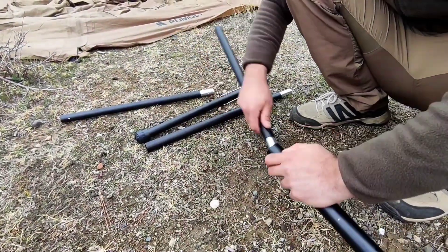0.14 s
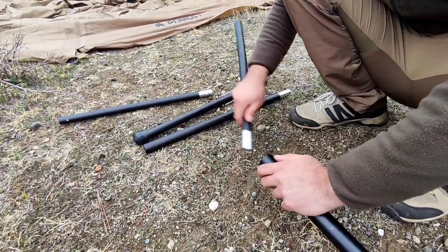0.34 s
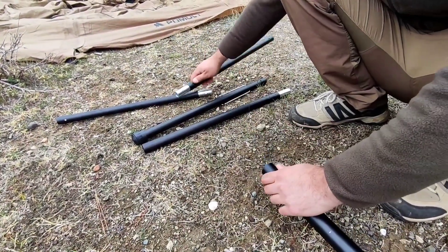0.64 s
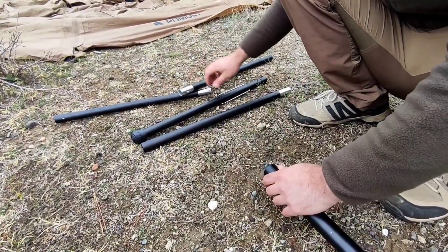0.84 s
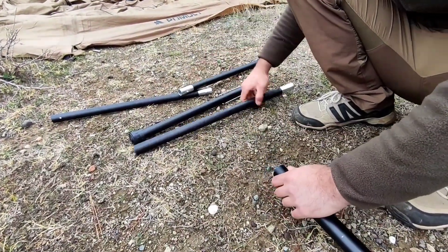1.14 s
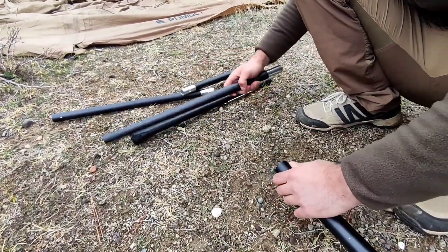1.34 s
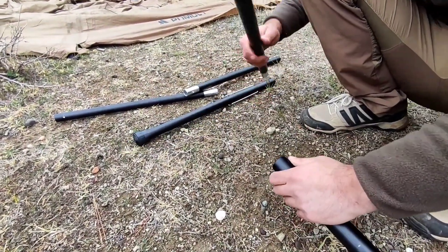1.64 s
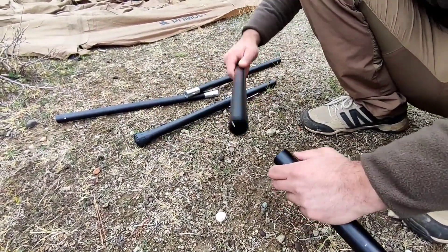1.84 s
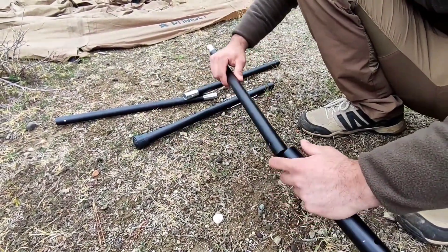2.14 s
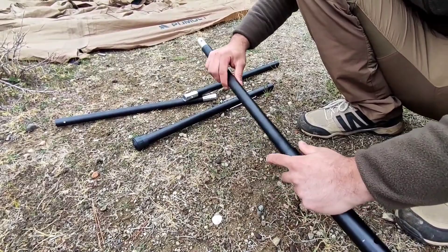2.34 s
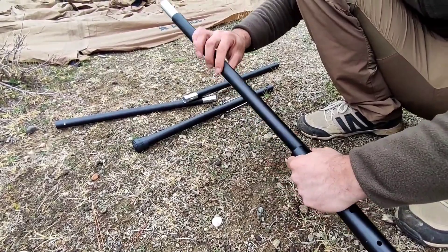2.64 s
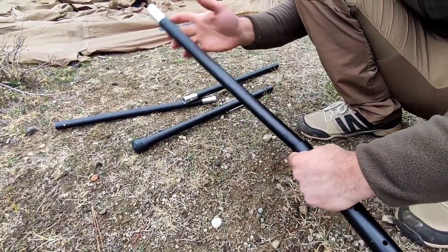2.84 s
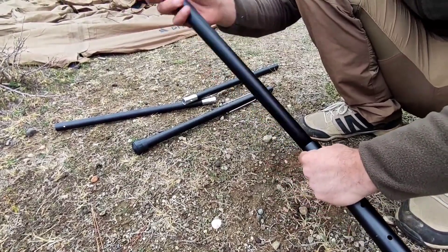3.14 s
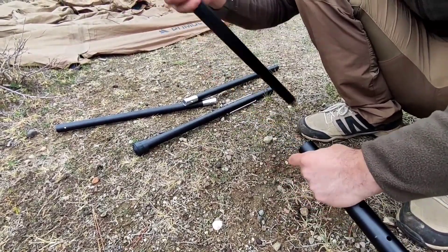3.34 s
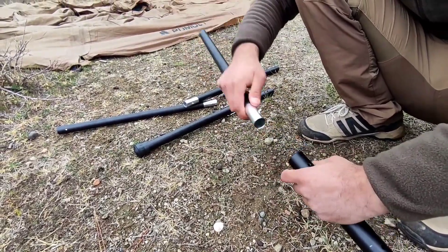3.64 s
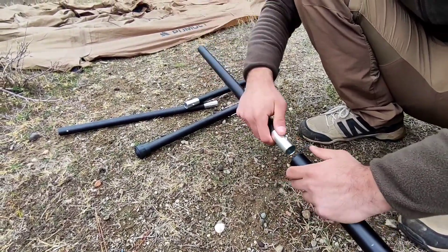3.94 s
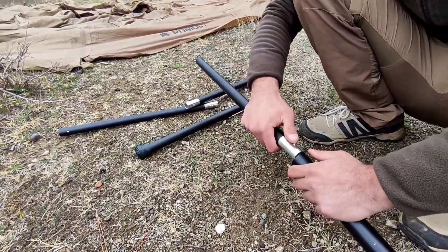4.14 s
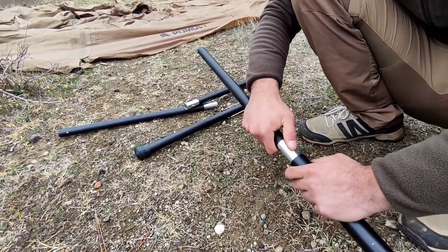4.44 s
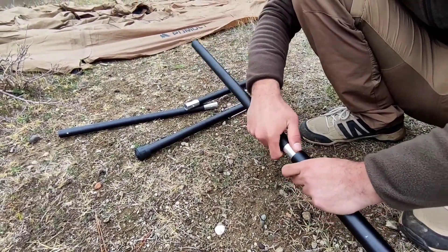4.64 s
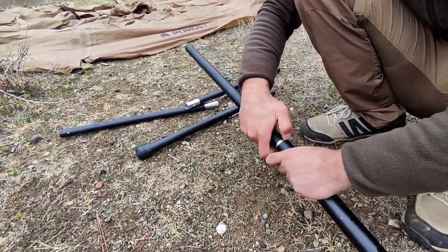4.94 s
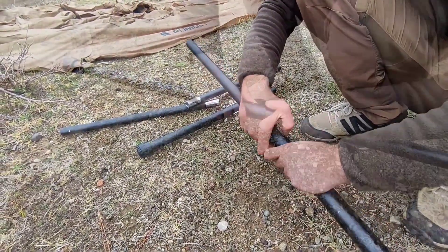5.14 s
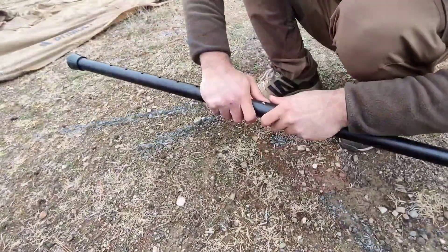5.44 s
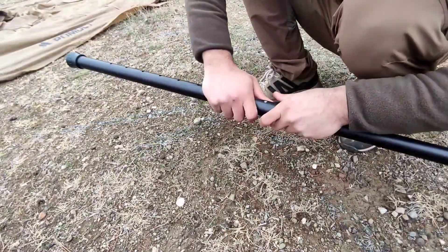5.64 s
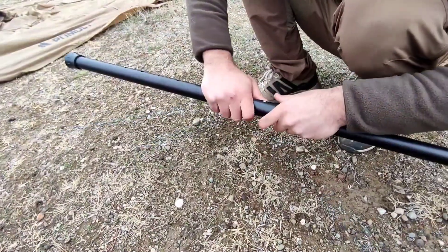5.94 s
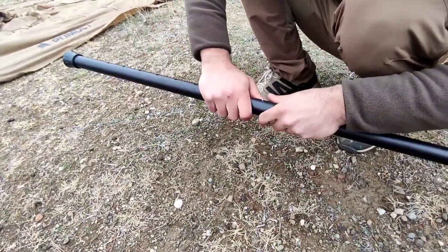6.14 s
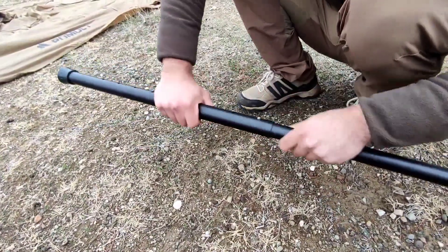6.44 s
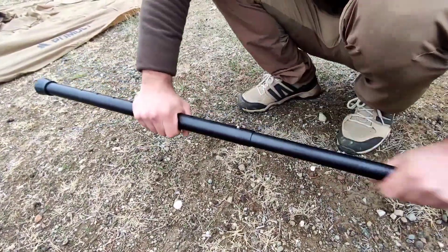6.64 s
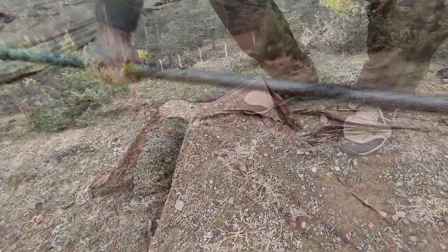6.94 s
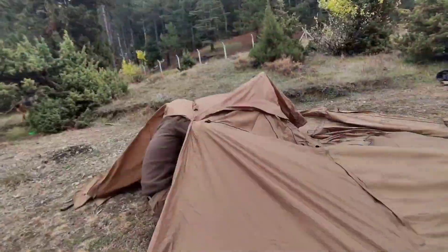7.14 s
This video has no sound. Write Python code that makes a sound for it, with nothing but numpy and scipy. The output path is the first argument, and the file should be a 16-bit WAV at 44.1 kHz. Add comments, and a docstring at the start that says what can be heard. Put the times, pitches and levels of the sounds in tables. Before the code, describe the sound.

Hollow tubes are dropped, picked up and pushed into each other on dry stony ground, very near the microphone. Bright clinks with short metallic ring alternate with thin grainy sliding hisses. A dense rattle of contacts leads to a firm locking clack, then only sleeve rustle, dry gravel clicks and wind. Low gust rumble flutters separately left and right throughout, in open air without echo.

```python
"""Wind buffets the two ports of a nearby microphone, with rustle and small crunches; then metal clinks from 0.75 s.
Tent-pole sections are dropped, picked up, tapped and slid together on gravel: bursts of contact noise drive
decaying modes, and grainy strokes of hiss ring the modes too. Stones and twigs click without a ring.
Sleeves and dry grass rustle as patchy hiss; air whistles in a swung tube as noise around a gliding pitch.
Behind it all gusts and single puffs push low noise into each port, almost independently."""
import sys
import numpy as np
from scipy import signal
from scipy.fft import rfft, irfft, next_fast_len
from scipy.io import wavfile

SR = 44100
rng = np.random.default_rng(int(sys.argv[2]) if len(sys.argv) > 2 else 0)


def materialize(psi):
    """Save the field psi as 16-bit PCM at rate SR to the path in sys.argv[1].

    A 1-D psi becomes a single channel; in a 2-D psi each row is a channel.
    """
    bounded = np.clip(np.atleast_2d(psi).T, -1, 1)
    quanta = np.round(bounded * 32767).astype(np.int16)
    wavfile.write(sys.argv[1], SR, quanta)


N = 321489  # samples, 7.29 s
SIDES = np.array([[.5], [-.5]])  # shares of a left-right difference in dB


def gain_of(db):
    """Decibels to a factor."""
    return 10 ** (np.asarray(db) / 20)


def evened(x):
    """Scales to rms 1."""
    return x / np.sqrt(np.mean(x ** 2) + 1e-20)


def read(points, hz):
    """Reads a spectrum on a log frequency axis."""
    f, value = np.transpose(points)
    return np.interp(np.log(hz + 1), np.log(f + 1), value)


def add(mix, s, pair, pan_db):
    """Places a pair of channels at a time, with a left-right level difference."""
    part = mix[:, round(s * SR):][:, :pair.shape[1]]
    part += (pair * gain_of(pan_db * SIDES))[:, :part.shape[1]]


APART = 1.4  # radians by which a near sound turns between the ports


def turn(hz):
    """Phase step between the ports: one port leads, then the other, band by band."""
    return APART * np.sign(np.sin((hz / 700) ** 1.5))


def coloured(count, db_of_hz, same):
    """Two ports of noise with one spectrum; the shared part is turned in phase."""
    size = next_fast_len(count, True)
    hz = np.fft.rfftfreq(size, 1 / SR)
    a, b = rfft(rng.standard_normal((2, size)), axis=1)
    second = same * a * np.exp(1j * turn(hz)) + np.sqrt(1 - same ** 2) * b
    spectra = np.array([a, second]) * gain_of(db_of_hz(hz))
    return evened(irfft(spectra, size, axis=1)[:, :count])


LUMP_LIMIT = 2.2  # soft limit, in multiples of the rms


def lumps(count, per_s):
    """Low-passed chance of rms 1 with soft limits, separate for each port."""
    slow = signal.butter(2, per_s, fs=SR, output="sos")
    free = evened(signal.sosfilt(slow, rng.standard_normal((2, count))))
    return evened(np.tanh(free / LUMP_LIMIT))


# Modes of the tube at hand, in order of handling: dropped, lifted, touching, loose, slotted, joined.
# Each row: pitch in Hz, relative level in dB, decay time to -60 dB in seconds under a neutral grip.
DROPPED = list(zip( [520, 910, 1270, 2055, 3196, 3308, 3419, 5039, 5179, 5462, 5734, 5850, 6580, 6890, 7917, 8942, 9024, 10380, 14072, 14541, 15180],
           [-9.5, -12, -5, 2, -14, 5, -7.5, -7, -12, -1.5, -4.5, -0.5, -6.5, -9.5, 3.5, -3, -6.5, -22.5, 2, -7, -13],
           [0.5, 1, 0.6, 0.17, 0.13, 0.17, 0.065, 0.19, .13, 0.16, 0.11, 0.1, 0.12, 0.11, 0.044, .05, 0.046, .04, 0.082, 0.14, 0.035]))
LIFTED = list(zip( [445, 1247, 2335, 3590, 4953, 5390, 5640, 5950, 6510, 7220, 7930, 8960, 10100, 11400, 13850, 14300, 14700, 15200],
          [7, 6, -7, -13, -8, -15, -16, -13, -13, -16, -12, -10, -14, -18, -2.0, -22, -7, -21],
          [0.12, 0.25, 0.13, 0.11, 0.42, 0.14, 0.14, 0.14, .12, .12, 0.14, 0.12, .12, .12, 0.24, .1, 0.1, .06]))
TOUCHING = list(zip( [430, 1400, 3655, 4957, 5006, 5243, 5949, 6395, 7004, 8656, 9717, 10810, 13850],
            [16.0, 13.0, 5.0, 5.5, 5, 1.5, -5.5, -2, -25.0, -5.5, -14, -27, 4.5],
            [0.097, 0.07, 0.11, 0.43, 0.16, 0.1, 0.073, .06, .06, 0.056, .06, .05, 0.087]))
LOOSE = [(407, 2, 0.24), (912, -8, 0.2), (1450, 3.5, 0.064), (1727, -1, 0.078), (2365, -3.5, 0.18),
         (2580, 3, 0.06), (3560, -3, 0.24), (4870, -16, 0.12), (5243, -2, 0.2), (5520, -11.5, 0.082),
         (6300, 1.5, 0.056), (6600, -6, 0.053), (7250, -7, .08), (9540, -5, 0.045)]
SLOTTED = [(407.6, 5, 0.22), (958, -13, 0.14), (1402, 4, 0.078), (1764, -5.5, 0.12), (2387, -1.5, 0.091),
           (2636, 2.5, 0.06), (2720, 1, 0.066), (3560, -5.5, 0.09), (4160, -3, 0.05), (4500, -18, 0.025),
           (5300, -4, 0.2), (5320, -5, 0.1), (6200, -11, 0.055), (5890, -4.5, 0.084), (6680, -15, 0.046),
           (7360, -10, 0.055), (9700, -1.5, 0.022)]
JOINED = list(zip( [1136, 1464, 4985, 5093, 5500, 6700, 8270, 9335, 13940],
          [-17.0, 0, 6.5, -2.5, -30.0, 4.0, -21.0, -14.5, -27.5],
          [0.2, 0.051, 0.12, 0.048, 0.028, 0.011, 0.027, 0.029, 0.15]))
# Moments when the next set of modes takes over. Each entry: time in seconds.
HANDOVER_S = [1.05, 2.0, 2.5, 3.8, 5.3]


def tube(s):
    """Modes of the section in the hands at that time, as pitch, level and decay."""
    states = [DROPPED, LIFTED, TOUCHING, LOOSE, SLOTTED, JOINED]
    return np.transpose(states[np.searchsorted(HANDOVER_S, s)])


# A ringing tube is louder in one port, band by band. Each row: frequency in Hz, left-right difference in dB.
PORT_LEAN = [(60, 3.0), (110, 6.0), (200, 7.0), (380, 2), (700, 1.5), (1290, -1.5), (2380, 3), (4400, 0.0),
             (8120, -3), (15000, 4.5)]
KIN, SPREAD = 4, .02  # neighbours of each mode; their relative pitch spread from 4 kHz up, less below
FAMILY_DB, FAMILY_TIME = -5, .45  # neighbours are weaker, most of all under 3 kHz, and die sooner
SWELL_S = 0.00097  # seconds; the modes build up over the time of contact


def ring(s, blocks, tone_db, grip, place_db):
    """Both ports' view of the modes after a unit blow; each blow wakes other neighbours of the modes."""
    hz, db, t60 = tube(s)[:, :, None]
    db = db + place_db * rng.standard_normal(hz.shape)
    kin = 1 + SPREAD * rng.standard_normal((KIN, *hz.shape)) * np.minimum(hz / 4000, 1)
    kin_db = db + FAMILY_DB * np.maximum(3000 / hz, 1)
    hz = np.vstack([hz, *(hz * kin)])
    db = np.vstack([db, *[kin_db] * KIN])
    t60 = np.vstack([t60, *[FAMILY_TIME * t60] * KIN])
    # complex exponent per sample: rotation and decay
    step = (2j * np.pi * hz - np.log(1000) / (t60 * np.maximum(grip, .05))) / SR
    levels = gain_of(db + tone_db(hz) + read(PORT_LEAN, hz) * SIDES.T).T
    ports = levels * np.exp(1j * np.array([0 * hz, turn(hz)])[..., 0])
    # the ringing is built block by block
    fine = np.arange(128)
    starts = ports[:, None] * np.exp(step * np.arange(blocks) * len(fine)).T
    rings = (starts @ np.exp(step * fine)).imag.reshape(2, -1)
    return rings * (1 - np.exp(-np.arange(rings.shape[1]) / SR / SWELL_S))


# Where a contact has its bass, middle, upper middle and treble. Each entry: frequency in Hz.
COLOUR_HZ = [800, 2600, 5600, 11000]
UNDER_DB = -13  # level at 150 Hz against the bass


def crack(db, bass_db, middle_db, upper_db, treble_db, t60):
    """A burst of chatter with a fast rise; also returns its colour and its envelope."""
    points = [(150, bass_db + UNDER_DB), *zip(COLOUR_HZ, [bass_db, middle_db, upper_db, treble_db])]

    def tone_db(hz):
        """Colour of the contact."""
        return read(points, hz)

    t = np.arange(4096) / SR
    rise = (1 - np.exp(-t / 0.0015)) ** 2
    decay = gain_of(-60 * t / max(t60, .003))
    tail = gain_of(-34.5 - 60 * t / 0.1)
    # many small contacts, not one smooth push
    shape = rise * (decay + tail) * gain_of(2.0 * lumps(len(t), 500.0)[0])
    burst = coloured(len(t), tone_db, same=0.21)
    return gain_of(db - 1.0) * shape * burst, tone_db, shape


# Blows of metal close to the microphone. Each row: start in seconds, level in dB, bass, middle, upper middle
# and treble in dB, left-right difference in dB, chatter decay in seconds, ring level against the blow in dB,
# grip as a factor on the ring time.
CLINKS = [(.752, -5.5, -11.5, -14, -15.5, -9.5, -4, 0.034, -15, 0.42),
          (.799, 1.5, -49, -24, -14.5, -10, 0, 0.016, -12, 0.99),
          (.856, -23.5, -13.5, -24, -11.5, -4, 0, 0.072, -4, 0.77),
          (1.121, -48, -47, -4.5, -26, -14.5, -5, 0.067, 7, 1.9),
          (1.328, -15, -11, -22.5, -10, -16, -3, 0.021, -4, 0.69),
          (1.336, -13, -24, -23.5, -18, -17, 9, 0.032, -13, 0.75),
          (1.344, -13, -18, -26.5, -19, -18.5, -2.5, 0.031, -6, 1.1),
          (1.35, -14, -31.5, -20, -19, -20, -1, 0.018, -8, 0.46),
          (2.172, -30, -9.5, -35.5, -12, -19.5, -1, 0.11, 0, 0.72),
          (2.182, -28.5, -27, -18.5, -11.5, -21.5, 4, 0.092, -21, 0.52),
          (2.197, -28.5, -24.5, -36, -14, -8, -1, 0.055, 0, 0.84),
          (2.21, -31, -12, -21, -22, -8, 0, 0.037, -11, 1.04),
          (2.696, -35.5, -5.5, -13, -11.5, -19, -3, 0.045, -0.5, 0.9),
          (2.909, -45, -22, -17.5, -13, -9, -2.5, 0.044, -2.5, 1.5),
          (2.94, -26.5, -4, -13.5, -12, -14, 0, 0.032, -6, 0.52),
          (3.112, -29, -22, -25, -14, -13, 1, 0.036, -6.5, 0.58),
          (4.155, -24.5, 4, -11.5, -10, -20.5, 0.5, 0.025, -11, 0.56),
          (4.361, -25.5, 14, -9, -8, -17, 0.5, 0.025, -24, 0.65),
          (4.721, -26, -15, -31, -14, -18, 1, 0.047, -17, .63),
          (4.73, -7.5, -32, -30.5, -14.5, -9.5, 3, 0.026, -12, 0.68),
          (4.794, -23.5, -5.5, -11, -10.5, -10, -0.5, 0.029, -13.5, 0.45),
          (4.869, -16.5, -9.5, -8, -12, -13.5, 1.5, 0.022, -13, 0.31),
          (4.909, -33, -12, -12, -13, -19, 0, 0.025, -16, .63),
          (5.003, -30.5, -25, -9, -16, -8, 2, 0.035, -35, .63),
          (5.015, -30.5, -13, -5, -12, -18, 2, 0.028, -31, .63),
          (5.068, -32.5, -23, -6, -18, -25, 3, 0.02, -22, .63),
          (5.079, -24.5, -8, -16, -10.5, 10, 3, 0.011, -8.5, 0.31),
          (5.11, -41, -24.5, -9, -10, -30, 0, 0.032, -14, 0.57),
          (5.154, -51, -5, -9, -13, -10, 6, 0.053, -2, 1.8),
          (5.177, -14, -20, -19, -9, 5, 6, 0.033, -14, 0.76),
          (5.184, -13, -7, -14.5, -10.5, -22, -0.5, 0.033, -8.5, .63),
          (5.202, -18.5, -4, -10, -17, -14, 2, 0.029, -21, 0.93),
          (5.264, -25.5, -10, -17.5, -14, -8, -1, 0.02, -14, 0.45),
          (5.275, -32, -36, -31, -14, -19, 0, 0.051, -13, .63),
          (5.335, -30.5, -13, -15.5, -17, -12, -3, 0.049, -16, 0.94),
          (5.343, -13, -21.5, -35, -11.5, -5, 2.5, 0.022, -15, 0.77),
          (5.656, -17, -29, -35, -16, -19, 0.5, 0.025, -1, 1),
          (5.744, -38, -27, -37, -16.5, -20, 0, 0.034, 1, 0.93),
          (5.804, -39, -15, -10, -14, -15, 0, 0.032, -13, 0.49),
          (5.906, -36.5, -14.5, -20, -16, -19, -0.5, 0.039, -12, 1.25),
          (6.027, -2, -16.5, -22, -10, -13.5, 3, 0.023, -11.5, 0.56),
          (6.031, -17.5, -3, -22, -9.5, -26, -2.5, 0.023, 3, 0.7)]
CHATTER_HZ = 2670  # the chatter is too light to drive the modes much under this pitch
PLACE_DB, RATTLE_DB = 1.5, 2.5  # mode spread with place of contact; unevenness of a ring that touches things


def clinks():
    """Each blow cracks; the first contact and the chatter ring the tube, the grip sets the ring time."""
    out = np.zeros((2, N))
    for s, db, bass_db, middle_db, upper_db, treble_db, pan_db, t60, ring_db, grip in CLINKS:
        burst, tone_db, shape = crack(db, bass_db, middle_db, upper_db, treble_db, t60)
        chatter = .8 * shape * rng.standard_normal(len(shape)) / np.linalg.norm(shape)
        force = signal.lfilter(*signal.butter(2, CHATTER_HZ, "high", fs=SR), chatter)
        force[70] += 1.15  # the first contact, 1.6 ms in
        modes = ring(s, SR // 300, tone_db, grip, PLACE_DB)
        modes = modes * gain_of(RATTLE_DB * lumps(modes.shape[1], 60.0)[0])
        rung = signal.fftconvolve(force[None], modes, axes=1)
        add(out, s, burst, pan_db)
        add(out, s, gain_of(db + ring_db) * rung, pan_db)
    return out


# Grainy strokes of ringing hiss; the last is a short swell of noise just before the blow at 6.027 s.
# Each row: start, strongest moment and end in seconds (the level curve takes the three in order of time),
# level in dB, dB lost by the end, bass, middle and treble in dB, ring in dB.
STROKES = [(0.447, 0.492, .54, -43, 18, -51, -26, 9.5, -12.5), (0.763, 0.76, .8, -27, 5.5, -4, -7, 5.5, -3),
           (0.804, 0.83, 0.856, -40, 9.5, -10, -15, 2, 4.5),
           (1.149, 1.178, 1.305, -65.5, 5.5, -41, -10, 16.5, 27.5),
           (2.703, 2.707, 2.82, -33, 34.5, -8.5, -13, -8, -16),
           (2.948, 2.88, 3.04, -43, 30.5, -4.5, -6, -3, 1.5),
           (3.118, 3.13, 3.2, -57.5, 15.5, -7, -7, 7, -7),
           (3.243, 3.278, 3.325, -42, 26, -11, -15.5, -4, -5),
           (4.265, 4.282, 4.355, -52.5, 5, -2.5, -9.5, 2.5, 4.5),
           (4.429, 4.516, 4.512, -43, 22, 0, -1.5, -1.5, -3),
           (4.501, 4.602, 4.66, -38.5, 46.5, -14, -6.5, -3.5, -9),
           (4.74, 4.743, 4.86, -51, 5.5, -13, -6, 7, -2), (4.881, 4.888, 5.0, -51.5, 14.5, -7, -2, 2, -4),
           (5.025, 5.036, 5.175, -57.5, 4, -9, -5, -7, -5.5),
           (5.21, 5.222, 5.335, -45, 11, -6.5, -9.5, 0, -7),
           (5.663, 5.676, 5.825, -46.5, 14, -9.5, -9.5, -3.5, -25),
           (5.902, 5.912, 6.012, -56, 8, -9, -7, -3, -3.5),
           (6.01, 6.017, 6.03, -35.5, 0.5, -10, -7, 3, 1.5)]
STROKE_RISE_DB, STROKE_GRIP = 23, .55  # rise to the strongest moment; factor on the ring time
STROKE_PLACE_DB, PATCH_DB = 2.5, 2.5  # each stroke favours other modes; each hiss band comes and goes alone
SLIDE = 0.018  # scale of the random mode drift as the overlap of the slotted sections changes


def strokes():
    """Grainy noise hisses in four bands and also drives the modes of the tube."""
    out = np.zeros((2, N))
    for *s, top_db, lost_db, bass_db, middle_db, treble_db, ring_db in STROKES:
        t = np.arange(s[0], s[-1], 1 / SR)
        db = top_db - np.interp(t, np.sort(s), [STROKE_RISE_DB, 0, lost_db])
        grain_db = 1.2 * lumps(len(t), 120.0)[0] + 2.8 * lumps(len(t), 600.0)[0]
        stroke = gain_of(db + grain_db) * signal.windows.tukey(len(t), .15)
        bands = ((bass_db, [(500, -49.5), (900, 3.0), (1700, 6.5), (2300, -40.5)]),
                 (middle_db, [(1300, -38.5), (1900, 2.0), (3000, -1.5), (4000, -61)]),
                 (-4.0, [(2500, -136), (3500, 5.5), (7000, 21), (8500, -10.0)]),
                 (treble_db, [(6000, -54.5), (8000, 4.5), (16000, 3.5)]))
        for level_db, band in bands:
            hiss = coloured(len(t), lambda hz: read(band, hz), same=0.98)
            patches_db = PATCH_DB * lumps(len(t), 50.0)[0]
            add(out, s[0], stroke * gain_of(level_db - 6 + patches_db) * hiss, 0)
        tone = [(1400, bass_db - 0.5), (2700, middle_db), (5000, 0.0037), (12000, treble_db - 14)]
        modes = ring(s[0], SR // 700, lambda hz: read(tone, hz), STROKE_GRIP, STROKE_PLACE_DB)
        force = stroke * gain_of(ring_db) * rng.standard_normal(len(t))
        sung = signal.fftconvolve(force[None], modes / np.linalg.norm(modes[0]), axes=1)
        # only the slotted sections drift in pitch
        slotted = tube(s[0])[0, 0] == SLOTTED[0][0]
        drift = SLIDE * rng.uniform(-1.1, 1) * slotted
        even = np.arange(sung.shape[1])
        warped = even + drift * (even - len(t) / 2) ** 2 / (2 * len(t))
        add(out, s[0], np.array([np.interp(warped, even, port) for port in sung]), 0)
    return out


# Gravel and twigs on the ground. Each row: start in seconds, level in dB, bass, middle, upper middle
# and treble in dB, left-right difference in dB, decay in seconds.
CRUNCHES = [(.061, -40, 30, -26, -16, -2, -18, 0.029), (0.167, -46, -4, -14, -14, -13, 2, 0.07),
            (0.384, -23, -22, -20, -16.5, -5, -2, 0.018), (.588, -49.5, -10, -39, -13, -8, -1, 0.21),
            (.652, -41, -13, -23, -13, -2, -2, .04), (6.469, -38, -20, -16, -7, -21, 1, 0.04),
            (6.515, -39, -1, -4, -9, -11, 2, 0.17), (6.713, -21.5, 2, -16, -53, -45, 1.5, 0.018),
            (6.742, -31, -10, -13.5, -16, -14, 0, 0.032), (6.781, -31, -12, -16, -8, -25, 4, .02),
            (6.789, -22, -8.5, -10, -9, -21, 3, 0.022), (6.813, -28.5, -6, -27, -16, -35, -3, 0.025),
            (6.822, -17, -34, -12.5, -12, -15.5, 1.5, 0.022), (6.839, -26, -20, -17, -18, -13.5, 0, 0.089),
            (6.852, -33.5, -14.5, -7.5, -8, -18, -1, 0.15), (6.988, -43.5, -7, -15, -13, -23, -1, 0.21),
            (7.233, -40, 4, -3, -13, -4.5, 1, 0.96)]


def crunches():
    """Small stones and twigs click without a ring, as under a shifting shoe."""
    out = np.zeros((2, N))
    for s, *colour, pan_db, t60 in CRUNCHES:
        add(out, s, crack(*colour, t60)[0], pan_db)
    return out


# A tube swung through the air. Each row: start and end in seconds, level in dB,
# air resonance at the start and at the end in Hz.
SWINGS = [(1.42, 2.05, -63.5, 1737, 1580), (3.4, 4.134, -69, 1672, 1634)]


def swings():
    """Air blows across the open end of the swung tube: a fuzzy whistle."""
    out = np.zeros((2, N))
    steep = signal.butter(4, 90, fs=SR, output="sos")
    for start, end, db, from_hz, to_hz in SWINGS:
        hz = np.linspace(from_hz, to_hz, round((end - start) * SR))
        # slow noise on a gliding carrier is a narrow band of noise
        a, b = signal.sosfilt(steep, rng.standard_normal((2, 2, len(hz))))
        whistle = evened(((a + 1j * b) * np.exp(2j * np.pi * np.cumsum(hz) / SR)).real)
        add(out, start, gain_of(db) * whistle * signal.windows.tukey(len(hz), .4), 0)
    return out


# Movement of sleeves and dry grass. Each row: time in seconds, relative level of the low rustle in dB,
# relative level of the treble rustle in dB.
RUSTLE = [(0.0, -59, -68), (.38, -58, -57), (.55, -61, -71), (.95, -52.5, -66), (1.15, -59.5, -63.5),
          (1.36, -61, -66), (1.54, -59.5, -59), (1.781, -59, -66), (2.1, -62.5, -73.5), (2.4, -59.5, -70),
          (2.8, -60, -66), (3.35, -59.5, -66.5), (3.96, -57.5, -72), (4.39, -63, -69.5),
          (4.8, -56.5, -58.5), (5.0, -59.5, -67.5), (5.22, -58.5, -54), (5.4, -62, -71), (5.83, -57.5, -69),
          (6.288, -61.5, -78.5), (6.39, -56.5, -48), (6.68, -55.5, -54), (7.05, -53, -54),
          (7.29, -46, -59.5)]
# Spectrum of the rustle. Each row: frequency in Hz, density in dB per Hz.
CLOTH = [(250, 5), (450, 2.5), (900, -4), (1600, -7.5), (2500, -6), (4230, -3.5), (6000, -6), (9000, -21),
         (14500, -10.5), (15500, -19.5), (15800, -48.5)]
MIDDLE_SHARE, MIDDLE_DB = 0.46, -8.5  # the middle blends low and treble levels, then is offset


def rustle():
    """Cloth and dry grass: patchy hiss whose three parts follow the movement."""
    times, *levels = np.transpose(RUSTLE)
    low_db, high_db = (np.interp(np.arange(N) / SR, times, level) for level in levels)
    middle_db = low_db + MIDDLE_SHARE * (high_db - low_db) + MIDDLE_DB
    parts = ((low_db, [(1800, 0), (4000, -40)]),
             (middle_db, [(1000, -40), (2300, 0), (6800, 0), (11000, -40)]),
             (high_db, [(5000, -40), (8000, 0)]))
    out = np.zeros((2, N))
    for db, band in parts:
        hiss = coloured(N, lambda hz: read(CLOTH, hz) + read(band, hz), same=0.55)
        out += gain_of(db + 3.5) * hiss
    return gain_of(1.77 * lumps(N, 28.0)[0]) * out


# Strength of the wind at the ports. Each row: time in seconds, relative level in dB, left-right difference in dB.
GUSTS = [(0.0, -39.5, 7), (0.71, -42.5, -7), (0.75, -41, 13), (1.08, -53.5, -11), (1.67, -37.5, 0),
         (1.76, -36, -14.5), (2.48, -59.5, 5), (2.6, -45, -7), (3.43, -42.5, 1.5), (3.94, -33.5, -8.5),
         (4.02, -35, 28), (4.28, -41, -9), (5.24, -46.5, 5.5), (5.42, -40.5, -12), (5.72, -26.5, 21),
         (5.83, -33, 9), (6.68, -35.5, 14), (7.02, -45.5, -11), (7.25, -47, 27), (7.29, -71, 2)]
# Single puffs that strike the ports. Each row: centre in seconds, relative level in dB, left-right difference in dB.
PUFFS = [(0.299, -42, 26), (.63, -52, -21), (0.763, -35.5, 22), (1.107, -40.5, -12), (1.252, -50, 2),
         (1.802, -36.5, -27.5), (1.96, -40.5, -18.5), (2.628, -44.5, -25.5), (2.81, -37, -28.5),
         (2.95, -47, -5), (3.182, -40.5, -20), (3.672, -33.5, -34), (3.74, -30, -27), (3.822, -32.5, 0.5),
         (3.922, -22, -19), (3.966, -32.5, 1), (4.035, -31.5, 18), (4.129, -42.5, -26), (4.26, -42.5, 0),
         (4.399, -37.5, -37.5), (4.8, -34, -28.5), (5.553, -33.5, 1.5), (5.707, -41, 36.5),
         (5.81, -75.5, 9.5), (5.875, -31, 14), (6.14, -37, 3), (6.44, -55.5, -10), (6.725, -33, 4),
         (7.05, -40.5, -40), (7.201, -23, 7.5), (7.254, -25.5, 12)]
# Spectrum of the thumps. Each row: frequency in Hz, density in dB per Hz.
BUFFET = [(25, -47), (45, -18), (65, 9), (100, 17), (135, 15.5), (190, 2.5), (280, -46.5)]
# Spectrum of the quicker flutter. Each row: frequency in Hz, density in dB per Hz.
ROAR = [(120, -2), (200, 4), (300, -6.5), (420, -13.5), (650, -35), (1000, -115)]
PUFF_S = 0.018  # half length of a puff in seconds
THUMP_SLOPE, THUMP_KNEE_DB = 0.31, -38.5  # above the knee the thumps grow slowly
FLUTTER_SLOPE, FLUTTER_EVEN_DB = 1.367, -24.5  # the flutter outgrows the push and equals it at this strength


def port_push(db, pan_db):
    """Pressure at each port; the left-right difference leaves the mean power alone."""
    return gain_of(db + pan_db * SIDES) / np.sqrt(np.cosh(pan_db * np.log(10) / 20))


def wind():
    """Eddies thump each port almost separately; a quicker flutter rides above and grows in strong puffs."""
    t = np.arange(0, N / SR, .002)
    times, *levels = np.transpose(GUSTS)
    push = port_push(*(np.interp(t, times, level) for level in levels))
    for s, db, pan_db in PUFFS:
        push = push + port_push(db, pan_db) * np.exp(-((t - s) / PUFF_S) ** 2)
    push = np.array([np.interp(np.arange(N) / SR, t, port) for port in push])
    strength = np.sqrt((push ** 2).mean(0))
    eddies = lumps(N, 22.3)
    thumps = evened(gain_of(4.1 * eddies) * coloured(N, lambda hz: read(BUFFET, hz), same=0.04))
    flutter = evened(gain_of(4.45 * eddies) * coloured(N, lambda hz: read(ROAR, hz), same=0.087))
    thump_gain = np.maximum(strength / gain_of(THUMP_KNEE_DB), 1) ** (THUMP_SLOPE - 1)
    flutter_gain = (strength / gain_of(FLUTTER_EVEN_DB)) ** (FLUTTER_SLOPE - 1)
    return gain_of(1.5) * push * (thump_gain * thumps + flutter_gain * flutter)


def scene():
    """All sources at the two ports."""
    return clinks() + strokes() + crunches() + swings() + rustle() + wind()


# Housing and ports of the microphone colour all sound. Each row: frequency in Hz, gain in dB.
HOUSING = [(3400, -1), (4250, -6), (4900, -1.5), (6600, -2), (7400, -5.5), (8500, 0), (10500, -5.5),
           (11400, -10), (13800, -9.5), (15300, -10), (16000, -29.5)]
EDGE_HZ = 16600  # upper band limit


def record(dry):
    """A bass cut against wind, the colour of the housing, then the band limit."""
    cut = signal.sosfilt(signal.butter(4, 56., "high", fs=SR, output="sos"), dry)
    hz = np.linspace(0, SR / 2, 257)
    colour = signal.firwin2(255, hz, gain_of(read(HOUSING, hz)), fs=SR)
    housed = signal.oaconvolve(cut, colour[None], "same")
    edge = signal.firwin(511, EDGE_HZ, window=("kaiser", 9), fs=SR)
    return signal.oaconvolve(housed, edge[None], "same")


dry = scene()
out = record(dry)
materialize(out)
```